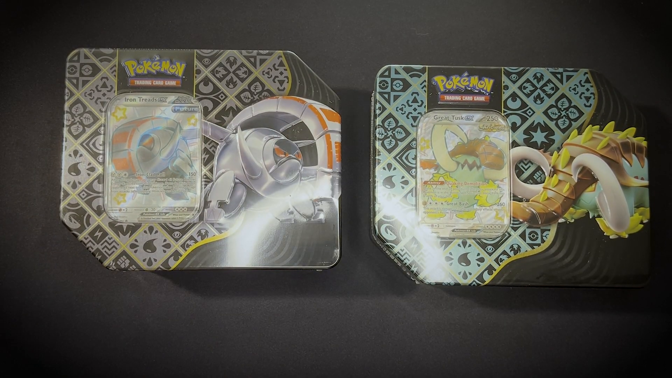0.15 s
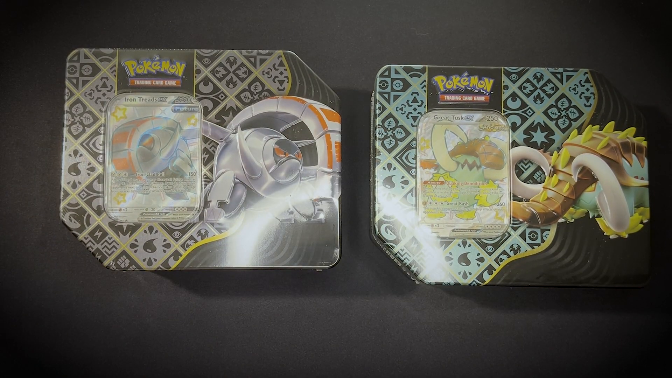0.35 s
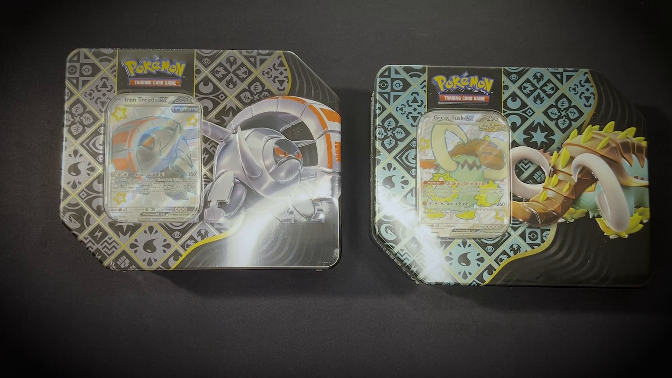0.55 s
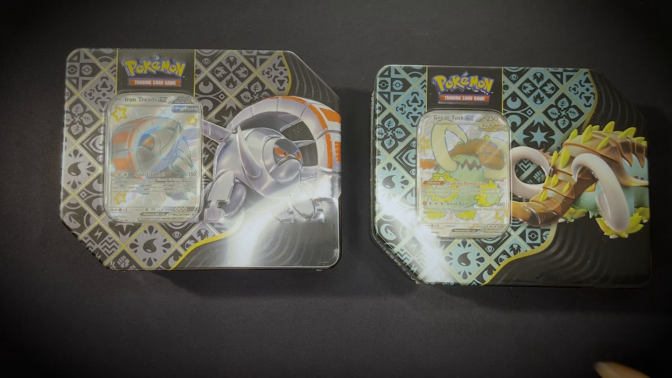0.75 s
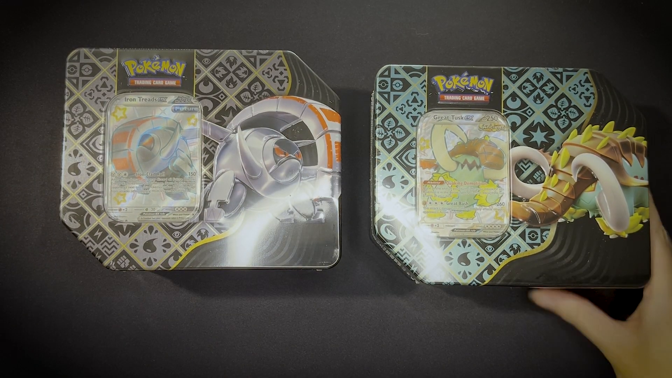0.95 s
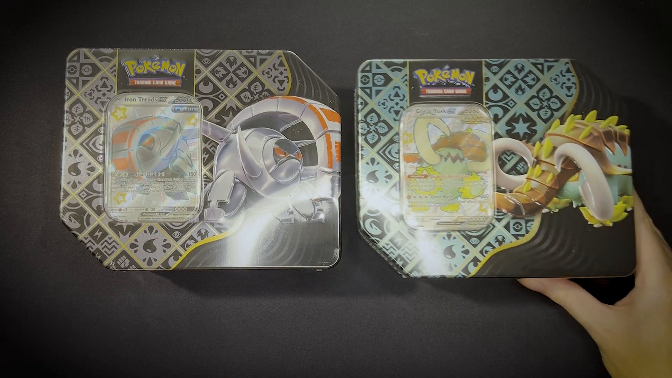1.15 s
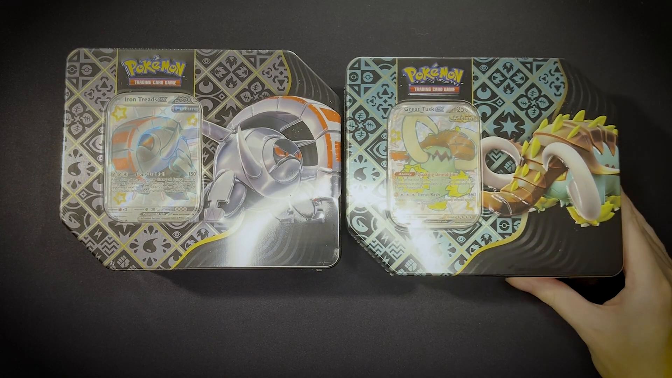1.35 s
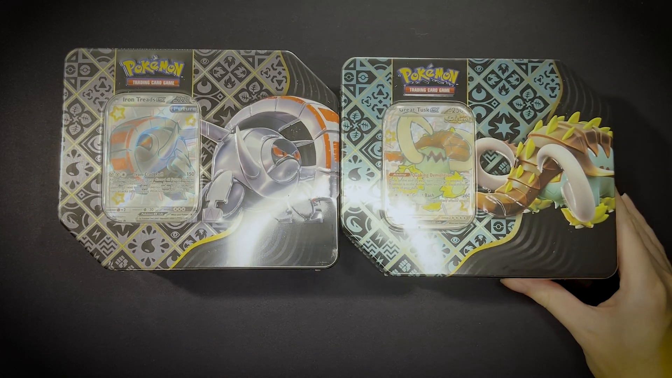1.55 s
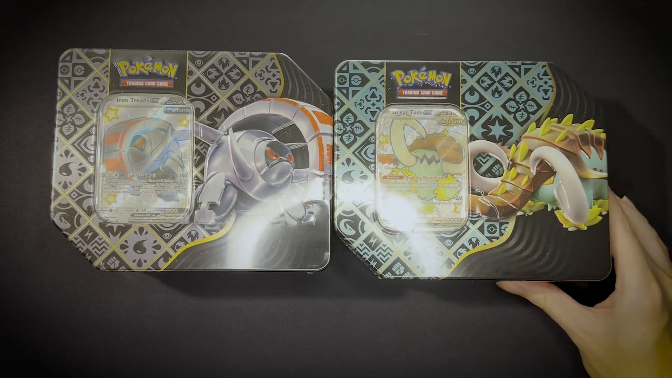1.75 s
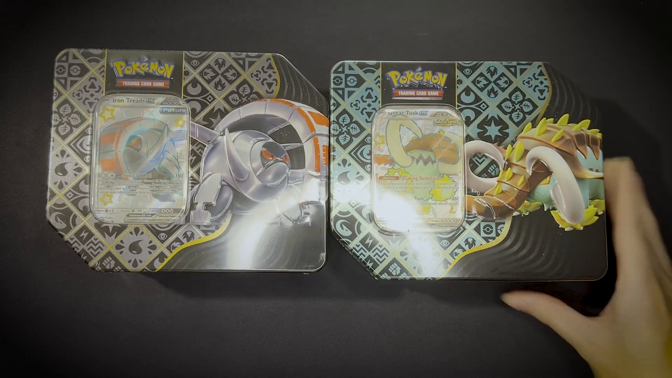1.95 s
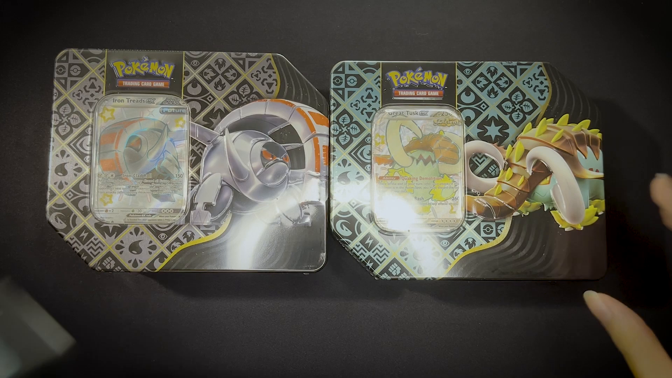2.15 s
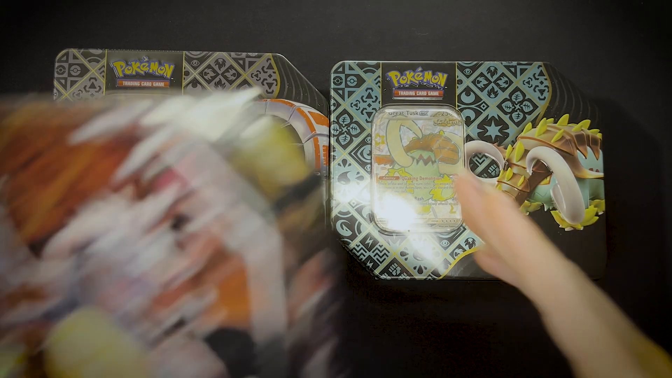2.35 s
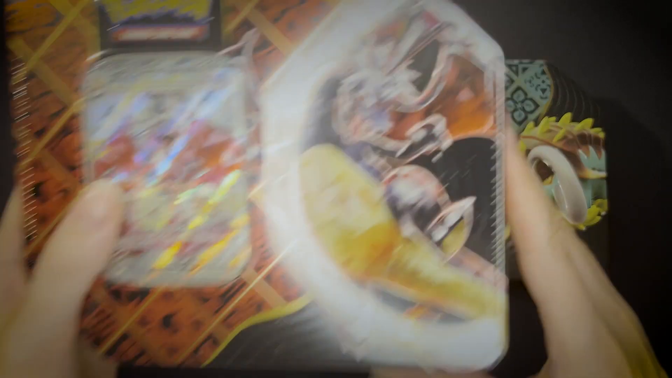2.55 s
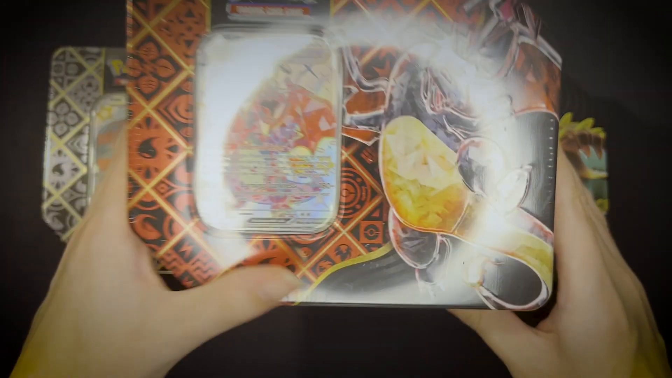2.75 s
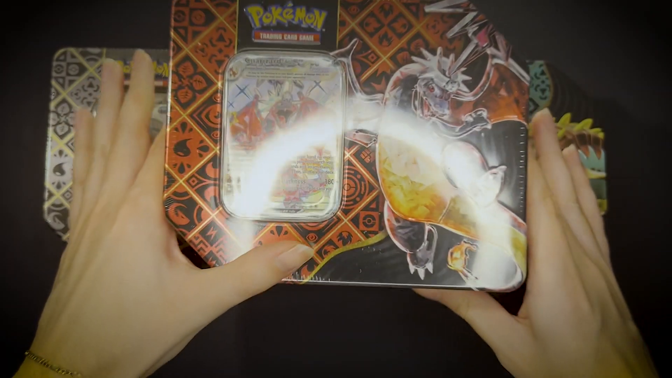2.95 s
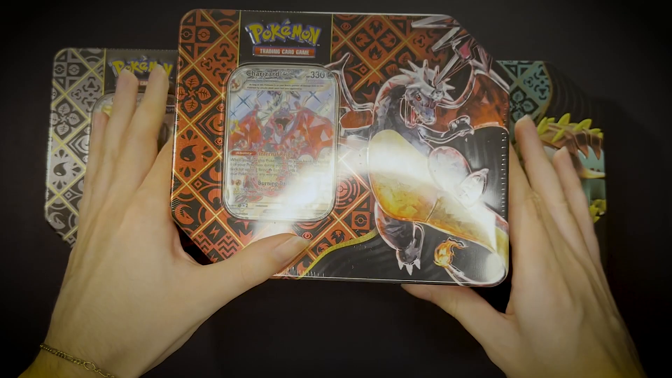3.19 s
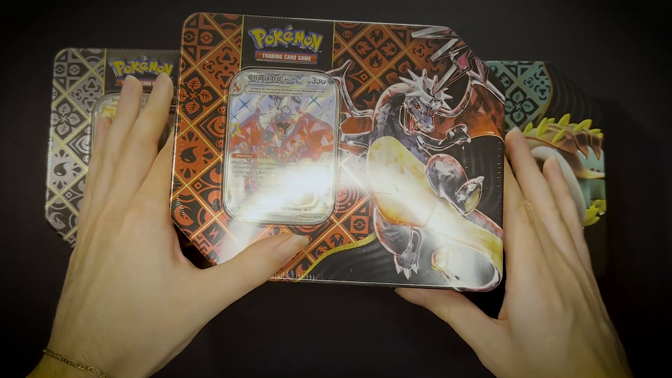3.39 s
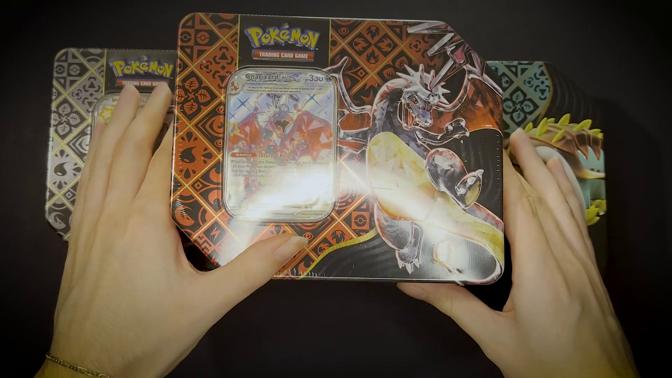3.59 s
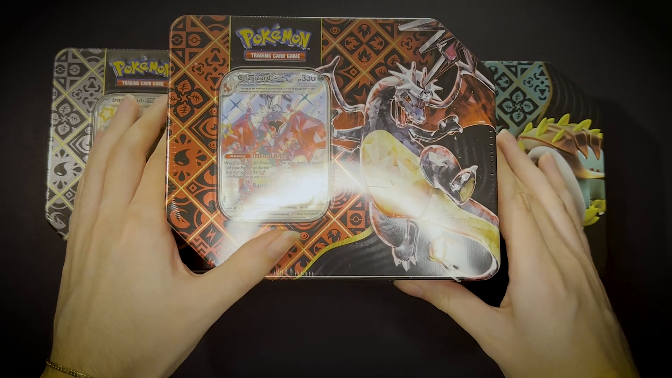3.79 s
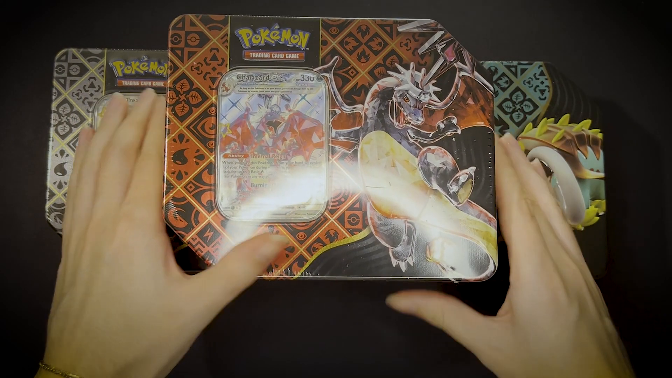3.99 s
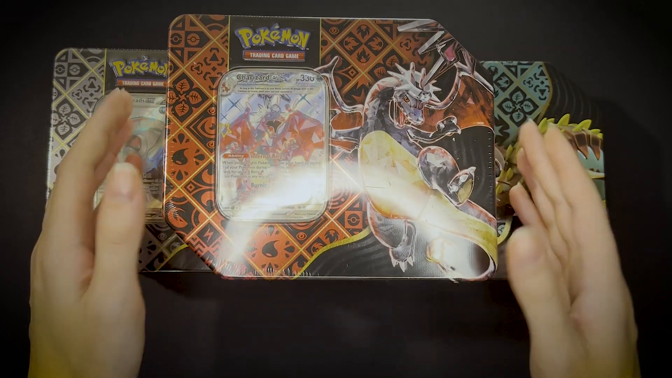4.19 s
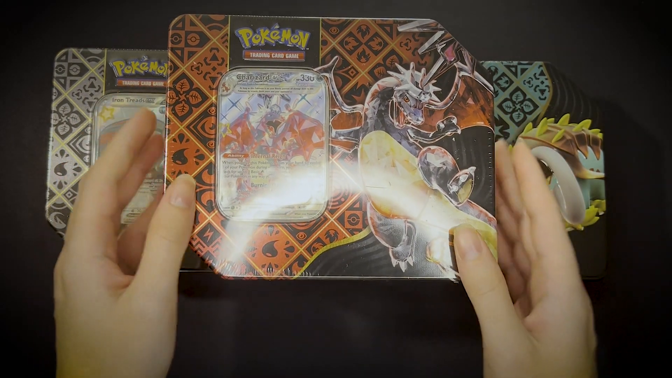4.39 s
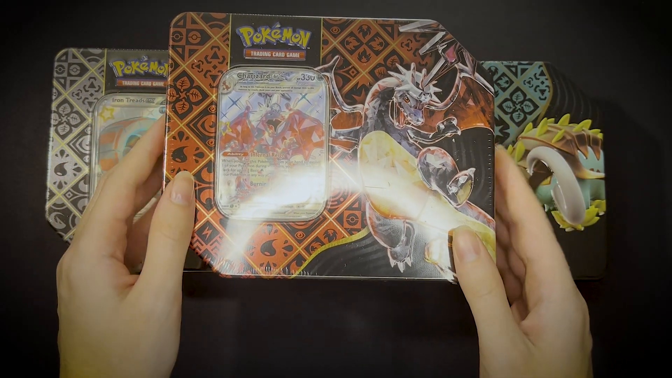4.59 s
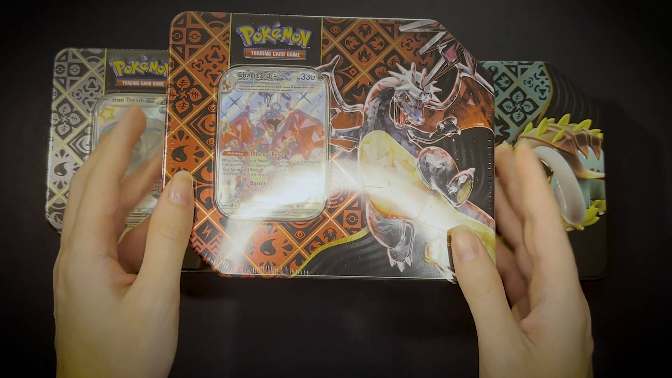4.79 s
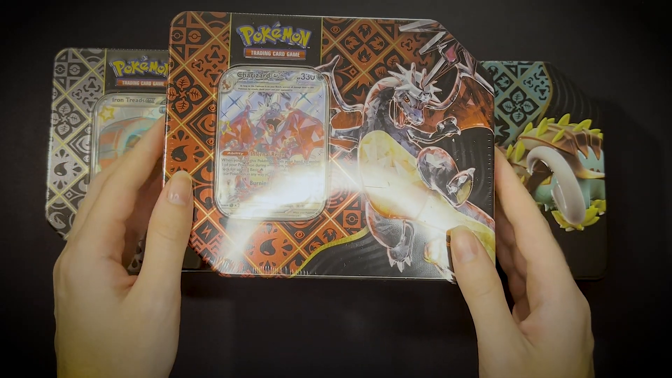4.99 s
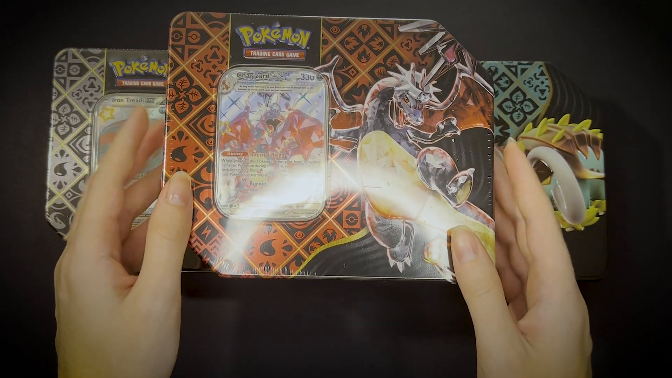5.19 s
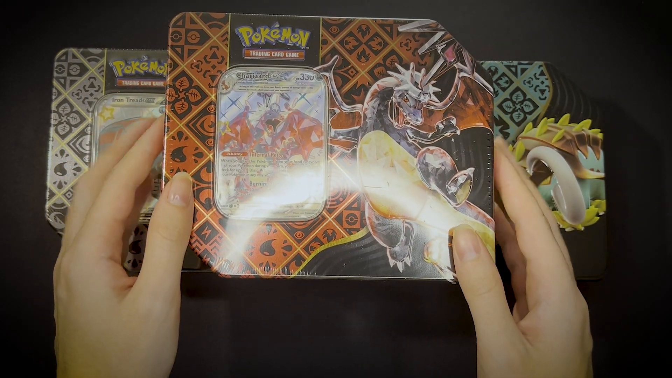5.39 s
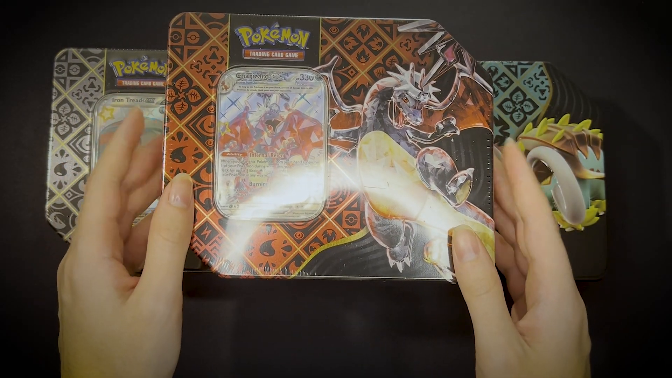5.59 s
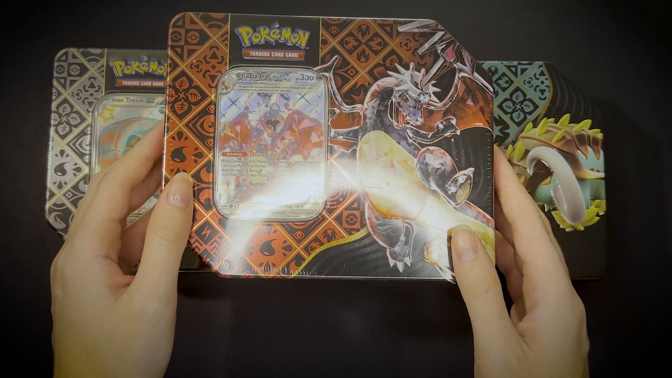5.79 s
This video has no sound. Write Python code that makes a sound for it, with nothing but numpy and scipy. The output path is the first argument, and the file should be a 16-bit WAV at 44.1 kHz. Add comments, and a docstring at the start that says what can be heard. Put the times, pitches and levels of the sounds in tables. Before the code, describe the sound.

Hands slide and set down film-wrapped metal tins on a padded desk, with one heavy hollow landing, then light irregular finger taps and crinkly clicks.

```python
"""Film-wrapped tin boxes are slid, picked up, set down and squared up by hand on a padded desk, in stereo.
Thuds are damped lid and wall modes driven by finger pads or landings; rims tick and film snaps as noise bursts.
Skin scuffs and a sliding box are shaped noise; dull bumps ring the low modes of the desk.
A small soft room adds a short noise tail, over coloured air noise and a faint fan hum of wavering sines."""
import sys
import numpy as np
from scipy import signal
from scipy.fft import rfft, irfft
from scipy.io import wavfile
from scipy.ndimage import uniform_filter1d

SR = 44100
rng = np.random.default_rng(int(sys.argv[2]) if len(sys.argv) > 2 else 0)


def wav_out(sig):
    """Save sig, one row per channel (or a flat mono array), as 16-bit PCM at SR to the path in sys.argv[1]."""
    wavfile.write(sys.argv[1], SR, np.round(np.clip(np.atleast_2d(sig).T, -1, 1) * 32767).astype(np.int16))


N = 257544
T = np.arange(N) / SR  # time, s
SPOT_DB = 8.5  # loss of a mode one octave from the favoured pitch, dB


def undb(db):
    """Turn dB into an amplitude factor."""
    return 10 ** (np.asarray(db) / 20)


def unit(x):
    """Scale to an rms of 1."""
    return x / np.sqrt(np.mean(x ** 2))


def unit_energy(x):
    """Scale to a total energy of 1."""
    return x / np.sqrt(np.sum(x ** 2))


def band(x, lo_hz, hi_hz, order=2):
    """Keep the band between two frequencies."""
    edges_hz = [lo_hz, min(hi_hz, .45 * SR)]
    return signal.sosfilt(signal.butter(order, edges_hz, "band", fs=SR, output="sos"), x)


def ring(hz, t60, swell_ms, size=8000):
    """One damped mode that builds up smoothly while the contact lasts."""
    t = np.arange(size) / SR
    swell = 1 - np.exp(-(1000 * t / max(swell_ms, .01)) ** 2)
    decay = 1000 ** (-t / max(t60, .005))
    return np.sin(2 * np.pi * hz * t) * decay * swell


def add(out, s, x):
    """Mix a sound into a layer from s seconds on, trimmed to the scene."""
    i = int(s * SR)
    out[..., max(i, 0):i + x.shape[-1]] += x[..., max(-i, 0):N - i]


def curve(table):
    """Gain along a table of seconds and dB, fading to silence at its ends."""
    rows = np.array(table)
    edge = np.clip(np.minimum(T - rows[0, 0], rows[-1, 0] - T) / 0.011, 0, 1)
    return edge * undb(np.interp(T, rows[:, 0], rows[:, 1]))


def walk(rate):
    """Random levels held 1 / rate s and slewed; spread near 1."""
    k = int(SR / rate)
    steps = np.repeat(rng.standard_normal(N // k + 1), k)
    return 1.47 * uniform_filter1d(uniform_filter1d(steps, k), k)[:N]


def air():
    """Room and microphone noise, more alike on both sides in the bass, with wavering fan lines."""
    # Spectral colour of the air noise. Each row: frequency in Hz, relative level in dB.
    air_colour = [(14, -8.5), (30, 3.5), (52, 4), (85, -6.5), (204, -9.5), (340, -11), (410, -13),
                  (750, -19), (2400, -27), (14700, -40.5), (16000, -34.5)]
    # Hum lines of the fan. Each row: frequency in Hz, mean level in dB rms.
    fan_lines = [(118.4, -75), (204.6, -70), (403.7, -73.5), ]
    level_db = -59.5
    hz = np.fft.rfftfreq(N, 1 / SR) + 1
    colour_hz, colour_db = np.array(air_colour).T
    colour = undb(np.interp(np.log(hz), np.log(colour_hz), colour_db))
    mid, side = (rfft(rng.standard_normal(N)) * colour for _ in range(2))
    side = side * np.clip(hz / 580.0, .4, 1)
    noise = unit(irfft(np.array([mid + side, mid - side]), N))
    noise = noise * undb(level_db + 0.16 * walk(1.8))
    hum = np.zeros(N)
    for f, db in fan_lines:
        level = np.sqrt(2) * undb(db + 0.79 * walk(8.0))
        phase = 2 * np.pi * np.cumsum(f + 1.11 * walk(29)) / SR
        hum += level * np.sin(phase)
    return noise + hum


def scuffs():
    """Skin rubs the film or tin in dense tiny slips of scattered size, under a swell and fade."""
    # Each row: middle in seconds, level in dB, half length in ms.
    scuff_rows = [(0.01, -61, 18), (0.074, -63, 42), (0.198, -58, 38), (1.999, -33, 25.7), (2.039, -44, 26),
                  (2.282, -52.5, 35), (2.45, -68, 22), (2.62, -52, 42), (2.727, -58, 12),
                  (3.581, -64.5, 44), (3.988, -56.5, 29), (4.031, -41, 17), (4.62, -59, 19),
                  (4.702, -52, 35), (4.788, -46.5, 20), (4.821, -55.5, 33), (5.07, -53.5, 63),
                  (5.169, -52.5, 32), (5.41, -50, 31), (5.531, -60.5, 75), (5.72, -56.5, 35)]
    centre_hz = 7350
    out, t = np.zeros((2, N)), np.arange(-6000, 6000) / SR
    chance = rng.standard_normal((len(scuff_rows), 3, len(t)))
    slips = undb(2.5 * rng.exponential(size=(len(scuff_rows), len(t) // 25))).repeat(25, axis=1)
    for (s, db, ms), noise, slip in zip(scuff_rows, chance, slips):
        grit = slip * (noise[0] + 4.6 * noise[1:])  # a shared part and one part per side
        rub = unit(band(grit, centre_hz / 2.52, centre_hz * 1.68, order=3))
        swell = np.exp(-(1000 * t / ms) ** 2)
        add(out, s + t[0], undb(db) * swell * rub)
    return out


def ticks():
    """A brief crease swells into a crack and a grainy burst, then the film settles in small slips."""
    # Rim ticks and film snaps. Each row: start in seconds, body level in dB, fizz level in dB,
    # decay constant of the burst in ms, colour in Hz.
    tick_rows = [(0.1508, -42, -56, 12, 5600), (0.174, -30, -39, 4.5, 6200), (0.18, -29.5, -53, 0.41, 6500),
                 (0.184, -38, -70, 8.9, 1740), (0.1867, -35, -37.5, 2.8, 6230),
                 (0.403, -54.5, -82, 9.5, 1640), (1.047, -57, -62, 2.5, 6000), (1.426, -69, -64, 1.5, 6500),
                 (1.5008, -16.5, -38, 3.4, 3670), (1.9635, -34, -33.5, 6.6, 4900),
                 (1.984, -29, -48, 9.1, 2140), (1.9957, -14.5, -24, 1.6, 2100),
                 (2.009, -41, -49, 2.8, 2270), (2.2442, -40, -53, 16, 2570),
                 (2.2599, -33.5, -40.5, 6.7, 3470), (2.2696, -40, -49, 5.5, 2260),
                 (2.523, -48.5, -75, 6.3, 4240), (2.589, -32.5, -39, 5, 5670), (2.634, -40, -44, 1.2, 4400),
                 (2.6885, -24, -45, 3.8, 4760), (2.711, -27, -43, 2.4, 5630), (3.2706, -19, -72, 3.5, 2740),
                 (3.357, -14.5, -63, 2.8, 2940), (3.5805, -51.5, -62, 3.1, 6940),
                 (4.019, -26, -34.5, 14.6, 4600), (4.039, -30, -29, 1.7, 1920),
                 (4.59, -44.5, -62, 4.5, 2530), (4.63, -39.5, -50, 3.7, 4400),
                 (4.6819, -32, -44.5, 4.8, 3550), (4.706, -37.5, -49, 4.6, 5610),
                 (4.7204, -34, -41, 6.3, 2600), (4.786, -34.5, -36, 6.1, 5600),
                 (4.799, -27, -37.5, 1.2, 4970), (4.9537, -48.5, -61, 7.3, 2860),
                 (4.9753, -35.5, -45, 1.4, 5700), (5.036, -26.5, -41.5, 3.8, 3560),
                 (5.057, -46, -51, 2.7, 3440), (5.0842, -36.5, -39, 9.2, 3940),
                 (5.152, -36.5, -40.5, 6.2, 4170), (5.278, -53.5, -68, 12, 2650),
                 (5.3066, -47.5, -69, 3.6, 3130), (5.353, -59, -71, 1.8, 5500),
                 (5.372, -39, -48.5, 5.7, 3160), (5.385, -28.5, -50, 1.8, 4000),
                 (5.4002, -26.5, -32, 2.9, 2540), (5.426, -34, -42, 6, 3800),
                 (5.508, -35, -36.5, 5.6, 6000), (5.518, -60, -41, 3.5, 6500),
                 (5.5496, -48.5, -53, 3.6, 2540), (5.6485, -52, -65, 3.1, 1870),
                 (5.692, -37.5, -45, 4.4, 3420), (5.7166, -40, -55, 1.9, 3620),
                 (5.7391, -32.5, -54, 4, 2650)]
    settle_db, settle_t60_s = -18, 0.2  # rustle of the film after a snap
    # short rim modes that colour a tick
    rim_modes_hz, rim_t60_s, rim_db = [2308, 2593, 3373, 3945, 4540, 6430], 0.016, -17.5
    body, fizz, t = np.zeros((2, N)), np.zeros((2, N)), np.arange(-1000, 7000) / SR
    chance = rng.standard_normal((len(tick_rows), 2, 3, len(t)))
    grain_db = 3.0 * rng.standard_normal((len(tick_rows), len(t) // 40 + 1))
    grain = undb(grain_db).repeat(40, axis=1)[:, :len(t)]  # crackle of the film
    after = np.maximum(t, 0)
    # leading axis: body, fizz
    spike = np.array([2.6, .6])[:, None, None] * (t >= 0) * np.exp(-after / 0.00036)
    settle = undb(settle_db) * (t >= 0) * 1000 ** (-after / settle_t60_s)
    apart = np.array([.3, .6])[:, None, None]  # the fizz comes from a wider patch than the body
    for (s, db, fizz_db, ms, hz), noise, g in zip(tick_rows, chance, grain):
        shared, sides = noise[:, :1], noise[:, 1:]
        length_ms = max(ms, .1)
        crack = np.exp(-1000 * (after + (after - t) / 0.41) / length_ms)  # a longer burst also swells longer
        burst = (g * crack + spike / length_ms ** 0.28) * (shared + apart * sides)
        burst = burst + settle * g ** 0.66 * (0.238 * shared + 1.62 * sides)
        coloured = 0.43 * band(burst[0], 0.68 * hz, 7500., order=3)
        coloured = coloured + 0.55 * band(burst[0], hz / 1.84, hz * 1.55, order=3)
        rim = np.zeros(2000)
        for f in rim_modes_hz:
            rim += undb(-SPOT_DB * np.log2(f / hz) ** 2) * ring(f, rim_t60_s, 0.018, size=2000)
        rung = signal.fftconvolve(burst[0], unit_energy(rim)[None])[:, :len(t)]
        coloured = coloured + undb(rim_db) * rung
        add(body, s + t[0], undb(db) * coloured)
        add(fizz, s + t[0], undb(fizz_db) * burst[1])
    fizz_low = undb(6.5) * band(fizz, 6500., 13000.0, order=3)
    fizz_high = undb(-2.5) * band(fizz, 12000.0, 18000.0)
    return body + fizz_low + fizz_high


def thuds():
    """A soft push thumps and swings the lid; an uneven clatter shakes the walls near the spot and is heard too."""
    # Finger pads or boxes landing. Each row: start in seconds, lid level in dB, lid pitch in Hz,
    # wall level in dB, wall pitch that the spot favours in Hz.
    thud_rows = [(0.18, -41.5, 345, -41.5, 1500), (0.398, -52, 239, -53, 1600), (1.019, -39, 409, -58, 830),
                 (1.042, -38.5, 326, -52, 830), (1.502, -21, 386, -24, 1400),
                 (1.963, -29.5, 326, -40, 1200), (1.99, -21, 402, -21, 1490),
                 (2.26, -45.5, 272, -36.5, 1510), (2.524, -43, 285, -59, 870),
                 (2.536, -39.5, 193, -44.5, 860), (2.691, -33.5, 384, -33, 810),
                 (2.711, -31, 363, -42, 850), (3.269, -22, 380, -15.5, 1370), (3.284, -32, 419, -26, 1180),
                 (3.323, -29.5, 450, -34, 1110), (3.3587, -2.5, 345, -17, 1110),
                 (3.401, -23.5, 338, -63, 700), (3.713, -51, 492, -59, 700), (4.022, -32.5, 379, -24, 1210),
                 (4.04, -31.5, 392, -38.5, 1460), (4.482, -39, 399, -56.5, 823),
                 (4.592, -38, 410.5, -50.5, 860), (4.606, -40, 312, -53, 880), (4.709, -42, 397, -43, 1000),
                 (4.878, -41, 382.5, -56.5, 800), (4.952, -34, 400, -52.5, 855),
                 (4.973, -43.5, 311, -48.5, 2400), (5.039, -45, 415, -43, 1010),
                 (5.062, -44.5, 406, -45, 825), (5.084, -43, 389, -37.5, 1080),
                 (5.197, -49.5, 405, -58, 830), (5.279, -41, 411.4, -47.5, 844),
                 (5.304, -47, 333, -47.5, 1380), (5.403, -46, 395, -38.5, 2100),
                 (5.424, -47, 366, -42.5, 1020), (5.566, -32, 374, -46.5, 850),
                 (5.58, -32.5, 371.6, -43.5, 846), (5.654, -33.5, 406.3, -45.5, 910)]
    # Modes of the tin walls. Each row: frequency in Hz, relative level in dB, free ring time (t60) in
    # seconds, of which the held box keeps 0.23.
    wall_modes = [(640, -8, 0.069), (802.3, 2.5, 0.37), (890, 5, 0.2), (1100, -2.5, 0.2), (1293, -1, 0.19),
                  (1394.5, -2, 0.17), (1510, -2.5, 0.17), (1642, -10, 0.17), (2243, 3, 0.27),
                  (2600, -10, 0.22), (2930, -7, .12)]
    # ring time at a lid level of 0 dB, its growth per dB of softer touch (as dB), and its ceiling
    lid_t60_s, lid_damp_per_db, lid_t60_max_s = 0.019, 0.77, 0.1
    pair_ratio, pair_db = 1.11, -4  # upper partner of the lid mode, shorter lived
    thump_ratio, thump_db = 0.775, -2  # heavily damped swing below the lid pitch
    wobble_db = 1.5  # the finger's changing pressure makes the lid ring unevenly
    lid, wall, t = np.zeros(N), np.zeros((2, N)), np.arange(4000) / SR
    chance = rng.standard_normal((len(thud_rows), 3, len(t)))
    rattles = undb(5.54 * rng.standard_normal((len(thud_rows), len(t) // 80))).repeat(80, axis=1)
    grips = rng.standard_normal((len(thud_rows), len(wall_modes), 2))  # each grip shifts and weights the modes
    for (s, lid_db, hz, wall_db, spot_hz), noise, rattle, grip in zip(thud_rows, chance, rattles, grips):
        t60 = min(lid_t60_s * undb(-lid_damp_per_db * lid_db), lid_t60_max_s)
        push_ms = 2.0 - 0.091 * lid_db  # a gentler finger stays in contact longer
        swing = ring(hz, t60, push_ms)
        thump = undb(thump_db) * ring(hz * thump_ratio, 0.4 * t60, push_ms)
        partner = undb(pair_db) * ring(hz * pair_ratio, 0.8 * t60, push_ms)
        add(lid, s - 0.0005 * push_ms, undb(lid_db + 3.5) * (swing + thump + partner))

        fade = 0.55 * np.exp(-t / 0.004) + 0.47 * rattle * np.exp(-t / 0.017)
        clatter = (noise[0] + 0.32 * noise[1:]) * fade
        modes = np.zeros(3000)
        for (f, db, mode_t60), (weight, shift) in zip(wall_modes, grip):
            mode_db = db + 4.0 * weight - SPOT_DB * np.log2(f / spot_hz) ** 2
            modes += undb(mode_db) * ring(f * (1 + .015 * shift), 0.23 * mode_t60, 0.067, size=3000)
        rung = signal.fftconvolve(clatter, unit_energy(modes)[None])[:, :len(t)]
        direct = band(clatter, 190.0, 1.85 * spot_hz, order=3)
        add(wall, s, undb(wall_db) * (undb(-8.5) * rung + undb(0.5) * direct))
    lid = lid * undb(wobble_db * walk(90.0))
    return wall + np.array([1.195 * lid, np.interp(T - .0001, T, lid)])  # lids lie nearer the left capsule


def bumps():
    """Pushes swing the desk modes; a longer push reaches only the low ones; the right side is louder and later."""
    # Dull bumps through desk and box floors. Each row: start in seconds, level in dB, push length in ms.
    bump_rows = [(.85, -51.5, 15), (1.287, -39.5, 10), (1.35, -42.5, 18), (1.504, -44.5, 6.5),
                 (1.963, -38, 1.8), (2.532, -42, 4.2), (2.695, -41.5, 2.8), (3.268, -27, 4.3),
                 (3.321, -33, 6.1), (3.361, -23, 4.0), (4.172, -50.5, 17), (4.589, -34.5, 1.2),
                 (4.955, -42, 1.5), (5.569, -32, 1.2), (5.654, -42.5, 1.3)]
    # Modes of the desk. Each row: frequency in Hz, relative level in dB.
    desk_modes = [(68.9, -25), (131.3, -13), (99.8, -18.5), (158.9, -7.5), (243, 5)]
    push_cut_db = 22.5  # loss of a mode that swings once during the push
    out, (hz, mode_db) = np.zeros(N), np.array(desk_modes).T
    rings = np.array([ring(f, 17.6 / f, 3.4, size=16000) for f in hz])  # t60 of 17.6 cycles
    for s, db, ms in bump_rows:
        reach_db = mode_db - push_cut_db * (hz * ms / 1000) ** 2
        add(out, s, undb(db + reach_db - reach_db.max()) @ rings)
    return np.array([out, 1.36 * np.interp(T - .0008, T, out)])


def slide():
    """A box slides over the desk mat: hiss of mat fibres and a duller scrape in the tin that edges up in pitch."""
    # Each row: time in seconds, hiss level in dB.
    slide_levels = [(1.0, -68), (1.035, -67), (1.06, -61), (1.21, -56.5), (1.37, -67.5), (1.6, -68.5),
                    (1.93, -69)]
    scrape_db = -7  # scrape in the tin, against the hiss
    noise = rng.standard_normal((2, N)) + 1.254 * rng.standard_normal(N)
    noise = noise * undb(0.92 * walk(62.0))
    rise = np.clip((T - 1.08) / 0.13, 0, 1)
    low_scrape = unit(band(noise, 870.0, 1800.0))
    high_scrape = unit(band(noise, 900.0, 1860.0))
    scrape = (1 - rise) * low_scrape + rise * high_scrape
    hiss = unit(band(noise, 3790.0, 10000.0, order=4))
    return curve(slide_levels) * (hiss + undb(scrape_db) * scrape)


def room(x):
    """Diffuse tail, slightly different at each capsule; the treble dies first."""
    t60_s, treble_t60_s, level_db = 0.16, 0.046, -13
    t = np.arange(12000) / SR
    noise = rng.standard_normal((2, len(t))) + 14.0 * rng.standard_normal(len(t))
    low = signal.sosfilt(signal.butter(1, 3000., fs=SR, output="sos"), noise)
    tail = low * 1000 ** (-t / t60_s) + (noise - low) * 1000 ** (-t / treble_t60_s)
    tail = band(tail * np.clip(t / 0.0067, 0, 1), 500.0, 9100.0)
    tail = tail / np.sqrt(np.sum(tail ** 2) / 2)
    return undb(level_db) * signal.fftconvolve(x, tail, axes=1)[:, :N]


def scene():
    """Place the handling sounds between the capsules, then add room, bumps and air."""
    # Side of the desk where the hands work. Each row: time in seconds, left minus right in dB.
    hand_side = [(.2, 4), (1.0, -2), (1.5, -0.5), (2.0, -3), (2.25, 5), (2.6, 0.5), (3.3, 1), (3.36, -1),
                 (4.8, 0.4), (5.0, 1), (5.8, 1)]
    left_lead = 2  # samples by which the left capsule hears the boxes first
    near = thuds() + ticks() + scuffs() + slide()
    pan_db = np.interp(T, *np.array(hand_side).T)
    near = near * undb(np.array([pan_db, -pan_db]) / 2)
    near[1] = np.roll(near[1], left_lead)
    return near + room(near) + bumps() + air()


def record(dry):
    """The recorder cuts the top steeply."""
    top_hz = 15900
    return signal.sosfilt(signal.ellip(10, .2, 70, top_hz, fs=SR, output="sos"), dry)


dry = scene()
out = record(dry)
wav_out(out)
```